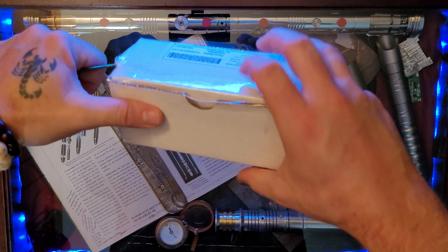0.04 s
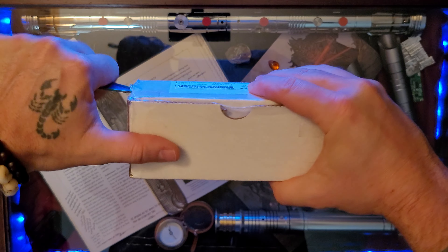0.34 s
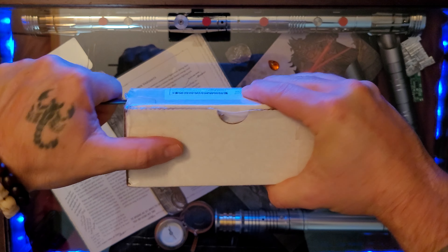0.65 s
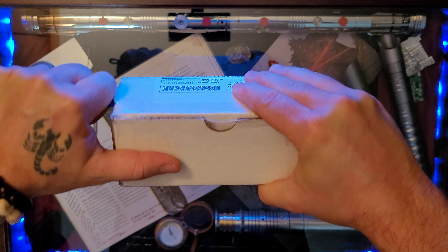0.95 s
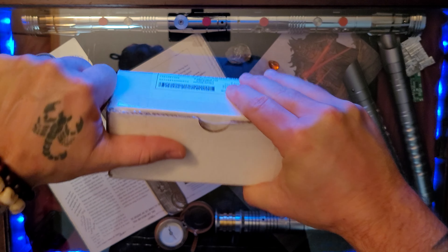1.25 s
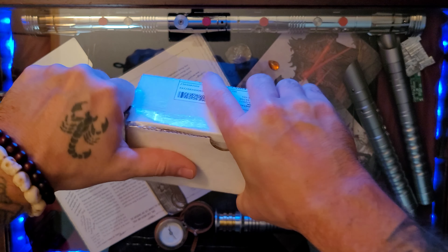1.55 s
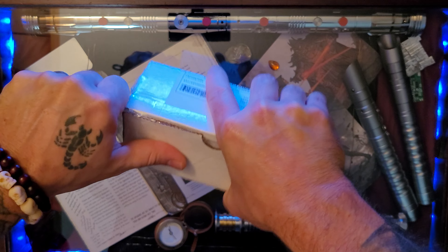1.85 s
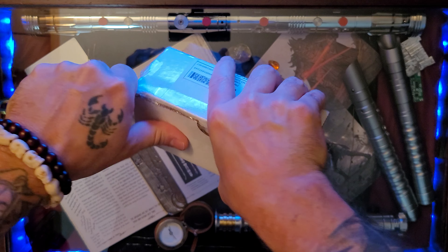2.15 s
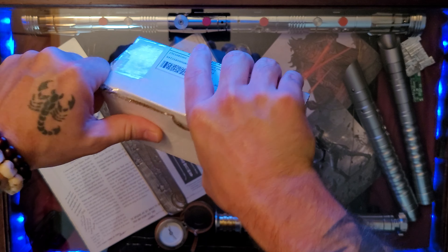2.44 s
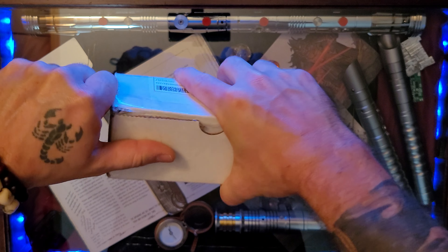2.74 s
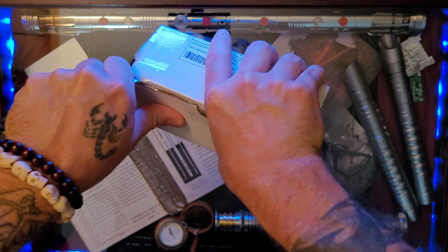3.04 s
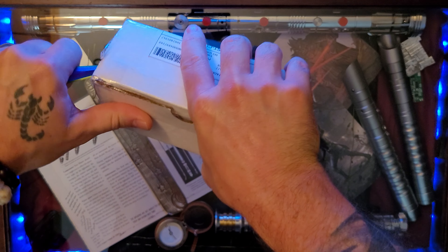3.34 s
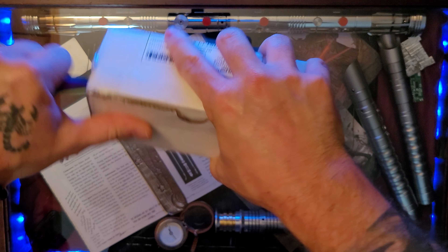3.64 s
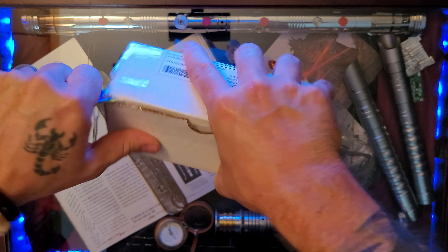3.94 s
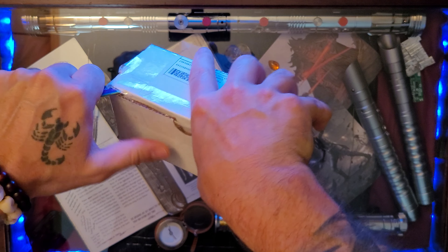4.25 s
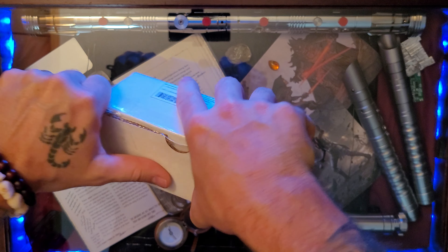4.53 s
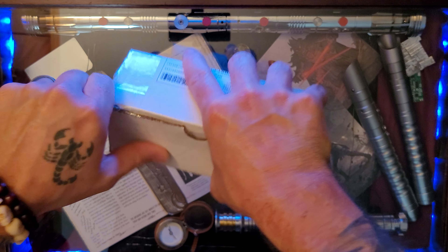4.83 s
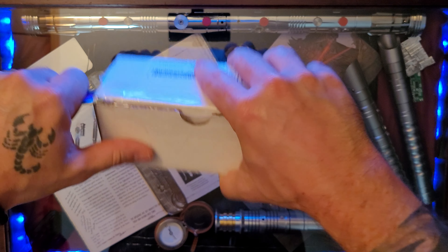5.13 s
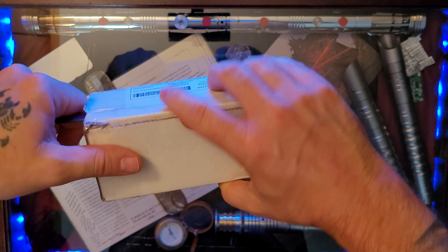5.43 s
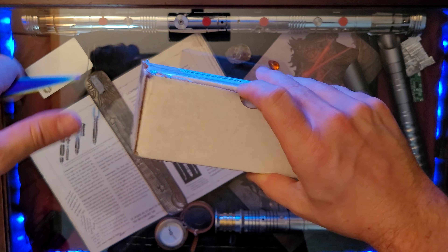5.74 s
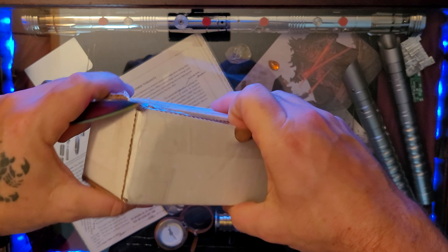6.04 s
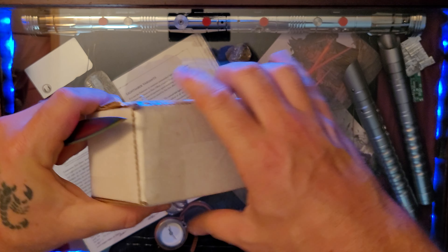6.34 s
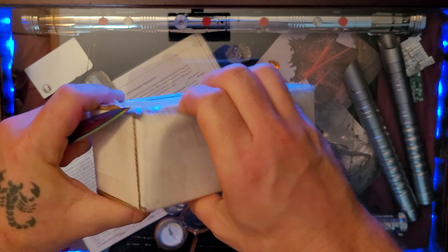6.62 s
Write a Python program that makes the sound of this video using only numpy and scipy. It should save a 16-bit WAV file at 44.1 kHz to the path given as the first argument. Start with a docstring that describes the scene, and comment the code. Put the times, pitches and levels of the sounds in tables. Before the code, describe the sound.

A blade works through a taped cardboard box in irregular, scratchy strokes, heard up close indoors. The tape ticks and squeaks briefly, fibres give way with dry snaps, and the box answers with dull, hollow bumps as fingers rub and shift on it. The cutting is strongest in the first few seconds, then comes in scattered bursts and ends with a cluster of clicks. The room is quiet, with very short echoes.

```python
"""In a quiet room, a knife saws through the packing tape of a small cardboard box, close by.
Each stroke is a stream of tiny slips that ring the box; the blade snaps through fibres and squeaks
on the tape, the film ticks, and hands and blade knock the hollow walls.
The table top and the room add short echoes over a low rumble."""
import sys
import numpy as np
from scipy import signal
from scipy.fft import rfft, irfft
from scipy.io import wavfile
from scipy.ndimage import map_coordinates

SR = 44100
rng = np.random.default_rng(int(sys.argv[2]) if len(sys.argv) > 2 else 0)


def waveform_to_disk(signal):
    """Save audio, clipped to [-1, 1], as 16-bit WAV at the path in sys.argv[1]."""
    frames = np.transpose(np.atleast_2d(signal))
    scaled = np.clip(frames, -1, 1) * 32767
    samples = np.round(scaled).astype(np.int16)
    wavfile.write(sys.argv[1], SR, samples)


N = 303408
TIME_S = np.arange(N) / SR
FFT_SIZE = 2 ** 19
FREQ_HZ = np.maximum(np.fft.rfftfreq(FFT_SIZE, 1 / SR), 1)


def undb(db):
    """Decibels to gain."""
    return 10 ** (np.asarray(db) / 20)


def unit_rms(x):
    """Scale to rms 1."""
    return x / np.sqrt(np.mean(x ** 2))


def curve_db(points):
    """Join (frequency [Hz], level [dB]) points on a log-frequency axis."""
    hz, db = np.transpose(points)
    return np.interp(np.log(FREQ_HZ), np.log(hz), db)


def colour(x, response_db):
    """Minimum-phase filter: resonances ring after the blow."""
    cepstrum = irfft(np.log(undb(response_db)))
    cepstrum[1:FFT_SIZE // 2] *= 2
    cepstrum[FFT_SIZE // 2 + 1:] = 0
    return irfft(rfft(x, FFT_SIZE) * np.exp(rfft(cepstrum)))[..., :x.shape[-1]]


def band(x, hz, kind, order=3):
    """Butterworth filter."""
    return signal.sosfilt(signal.butter(order, hz, kind, fs=SR, output="sos"), x)


def wander(rate_hz):
    """Slow random curve, spread near 1."""
    knots = rng.standard_normal(N // 20)
    return np.interp(TIME_S * rate_hz, np.arange(len(knots)), knots)


def ring(t, hz, t60_s, rise_s):
    """Damped mode, pushed over a short contact time."""
    return np.sin(2 * np.pi * hz * t) * undb(-60 * t / t60_s) * (1 - np.exp(-t / rise_s))


def burst(t, decay_s):
    """Exponentially decaying noise."""
    return rng.standard_normal(len(t)) * np.exp(-t / decay_s)


def swell_db(at_s, hold_s, attack_s, release_s):
    """Blade pressure below its peak; attack and release span 20 dB and take at least 2 ms."""
    before = np.maximum(at_s - TIME_S, 0) / max(attack_s, 0.002)
    after = np.maximum(TIME_S - at_s - hold_s, 0) / max(release_s, 0.002)
    return -20 * (before + after)


def add(track, at_s, sound):
    """Mix a sound in at a time."""
    start = max(int(at_s * SR), 0)
    track[start:start + len(sound)] += sound[:N - start]


def stereo(mid, side):
    """Left and right from mid and side."""
    return np.array([mid + side, mid - side])


# room noise spectrum: (frequency [Hz], level [dB])
ROOM_SPECTRUM = [(20, -21), (35, 3.5), (52, 20), (72, 7), (100, -2.5), (160, -11.5), (240, -4.5),
                 (370, -5.5), (650, -3.5), (1200, -11), (2000, -13), (4000, -30.5), (8000, -52.5),
                 (16000, -23.5)]
# room noise width: (frequency [Hz], side minus mid [dB])
ROOM_SIDE = [(50, -11), (300, -5), (2000, -0.5), (12000, 7)]


def room_tone(level_db=-67.5, waver_db=1, waver_hz=2.19):
    """Low rumble and faint hiss of the room, wavering slightly."""
    mid, side = colour(rng.standard_normal((2, N)), curve_db(ROOM_SPECTRUM))
    noise = stereo(mid, colour(side, curve_db(ROOM_SIDE))) / np.std(mid)
    return noise * undb(level_db + waver_db * wander(waver_hz))


# echo colour, mid channel: (frequency [Hz], gain [dB])
ECHO_MID = [(100, -6), (400, -16), (1200, -9), (2500, 1), (6000, -4), (16000, -1.5)]
# echo colour, side channel: (frequency [Hz], gain [dB])
ECHO_SIDE = [(100, -7), (350, -15), (700, -4.5), (1200, -8.5), (2500, -0.5), (12000, 3)]


def echoes(x, near_t60_s=0.033, near_db=-3, room_t60_s=0.14, room_db=-15, hop_samples=6000):
    """Hands, box and table top scatter the sound at once; the room answers fainter and duller."""
    t = np.arange(SR // 4) / SR
    mid, side = np.zeros((2, N))
    # the box never rests: each stretch crossfades into a new echo pattern
    for centre in range(0, N, hop_samples):
        first, last = max(centre - hop_samples, 0), centre + hop_samples
        fade = np.cos(np.pi / 2 * (TIME_S[first:last] * SR - centre) / hop_samples)
        stretch = x[first:last] * fade
        near = rng.standard_normal((2, len(t))) * undb(-60 * t / near_t60_s) * (t > 0.0003)
        room = band(rng.standard_normal((2, len(t))), 6500, "low", order=1)
        room *= undb(-60 * t / room_t60_s) * (t > 0.008)
        response = (unit_rms(near) * undb(near_db) + unit_rms(room) * undb(room_db)) / np.sqrt(len(t))
        for track, echo in zip((mid, side), signal.fftconvolve(stretch[None], response, axes=1)):
            add(track, first / SR, echo)
    return stereo(colour(mid, curve_db(ECHO_MID)), colour(side, curve_db(ECHO_SIDE)))


# tape film ticks: (time [s], level [dB])
FILM_TICKS = [(0.132, -53), (0.667, -40.5), (1.599, -39.5), (1.6299, -32.5), (1.8471, -39.5), (2.024, -50),
              (2.1137, -35.5), (4.781, -46), (5.8706, -46), (6.0006, -36), (6.2095, -42), (6.304, -42.5)]


def tape_ticks(decay_s=0.0045, gain_db=-6.5, highpass_hz=4000):
    """The film lets go at one point, too lightly to shake the box."""
    t = np.arange(SR // 20) / SR
    ticks = np.zeros(N)
    for at_s, level_db in FILM_TICKS:
        add(ticks, at_s, burst(t, decay_s) * undb(level_db + gain_db))
    return band(ticks, highpass_hz, "high", order=1)


# tape squeaks: (peak time [s], 20 dB rise and fall [s], top pitch [Hz], level [dB])
# a negative rise and fall acts as 2 ms: a blip
TAPE_SQUEAKS = [(.5, -0.52, 2580, -49), (.765, -0.39, 3260, -46), (.81, 0.1, 3520, -41),
                (1.892, -0.04, 3000, -30), (2.478, -0.04, 2990, -33), (2.945, 0.14, 3004, -56),
                (5.13, -0.18, 3070, -44)]


def tape_squeaks(flutter_hz=150, sag_hz_per_db=15, gain_db=-3):
    """Stick-slip of blade on tape: a rough whistle whose pitch sags as the pressure eases."""
    squeaks = np.zeros(N)
    flutter = unit_rms(band(rng.standard_normal((2, N)), flutter_hz, "low", order=2))
    for at_s, fade_s, top_hz, level_db in TAPE_SQUEAKS:
        pressure_db = swell_db(at_s, 0, fade_s, fade_s)
        live = pressure_db > -40
        phase = 2 * np.pi * np.cumsum(top_hz + sag_hz_per_db * pressure_db[live]) / SR
        whistle = flutter[0, live] * np.cos(phase) + flutter[1, live] * np.sin(phase)
        squeaks[live] += whistle * undb(level_db + gain_db + pressure_db[live])
    return squeaks


# blade modes: (frequency [Hz], level [dB], t60 [s])
BLADE_MODES = [(2950, -2, 0.033), (3160, -4, 0.015), (3560, 4.5, 0.011), (3930, -0.5, 0.016),
               (4270, -8, 0.016)]


def blade_flick(at_s=6.3852, gain_db=-25, rise_s=0.0001):
    """The tip jumps free of a cardboard edge and rings briefly."""
    t = np.arange(SR // 5) / SR
    flick = np.zeros(N)
    for hz, level_db, t60_s in BLADE_MODES:
        add(flick, at_s, ring(t, hz, t60_s, rise_s) * undb(level_db + gain_db))
    return flick


# box resonances: (frequency [Hz], width [Hz], lift [dB])
BOX_RESONANCES = [(334, 114, 4), (372, 83, 5.5), (520, 43, 2.5), (442, 30, 1.5), (797, 210, 6),
                  (992, 24, 9), (1181, 139, 14.5), (1356, 37, 10.5), (1428, 57, 7.5), (1603, 126, 7),
                  (1786, 51, 5), (1991, 27, 6.5), (2460, 50, 1.5), (2880, 1220, 6.5), (3800, 110, 3),
                  (5000, 300, 3), (7600, 1560, -3)]


def box_lift_db():
    """Lift that the box's resonances give to whatever shakes it."""
    return sum(db / (1 + (2 * (FREQ_HZ - hz) / width_hz) ** 2) for hz, width_hz, db in BOX_RESONANCES)


# modes of the whole hollow box: (frequency [Hz], level [dB])
BOOM_MODES = [(73, -2.5), (148, -2), (168, -5.5), (208, -1.5), (256, -9)]
# wall knocks: (time [s], level [dB], wall mode [Hz], relative boom [dB])
WALL_KNOCKS = [(0.428, -39, 396, -38), (0.584, -25.5, 317, -14), (0.847, -28, 670, -22),
               (0.944, -35.5, 593, -8), (1.025, -35, 390, -19), (1.131, -41.5, 440, -27.5),
               (1.53, -40, 390, -10), (1.634, -28.5, 345, -18), (1.885, -24.5, 410, -36),
               (2.188, -41.5, 350, -4.5), (2.556, -37.5, 370, -9.5), (2.72, -46, 390, -7.5),
               (2.783, -52, 372, -16), (3.865, -49, 340, -1.5), (3.022, -30, 535, -20.5),
               (4.365, -34, 292, -9), (4.555, -43, 537, -25), (4.628, -26, 347, -12.5),
               (4.67, -21, 430, -17), (4.882, -40.5, 470, -14.5), (5.092, -31.5, 364, -8.5),
               (5.248, -39, 430, -10.5), (5.537, -43, 294, -3.5), (5.757, -24, 404, -23),
               (5.892, -31.5, 327, -16), (6.12, -28.5, 281, -7.5), (6.157, -43.5, 280, 2),
               (6.293, -40, 415, -30), (6.383, -26.5, 581, -25), (6.423, -28.5, 397, -14.5),
               (6.532, -40, 603, -24), (6.619, -30.5, 376, -16), (6.642, -20, 423, -17.5)]


def wall_knocks(wall_t60_s=0.039, boom_t60_s=0.094, tone_db=-5, scuff_db=-8, scuff_s=0.011):
    """A soft blow rings one wall and the whole box, with a short dull scuff."""
    t = np.arange(SR // 5) / SR
    tones, scuffs = np.zeros((2, N))
    # where the blow lands sets each mode's first swing
    polarities = rng.choice([-1, 1], (len(WALL_KNOCKS), len(BOOM_MODES)))
    modes = np.array([ring(t, hz, boom_t60_s, rise_s=0.003) * undb(db) for hz, db in BOOM_MODES])
    for (at_s, level_db, wall_hz, boom_db), polarity in zip(WALL_KNOCKS, polarities):
        wall = ring(t, wall_hz, wall_t60_s, rise_s=0.0051)
        boom = polarity @ modes * undb(boom_db)
        add(tones, at_s, (wall + boom) * undb(level_db + tone_db))
        add(scuffs, at_s, burst(t, scuff_s) * undb(level_db + scuff_db))
    return tones + colour(band(scuffs, [200, 1000], "band", order=2), box_lift_db())


# snap spectrum: (frequency [Hz], level [dB])
SNAP_SPECTRUM = [(100, -48), (500, 2), (1200, -2), (3000, -4.5), (6000, -0.5), (10000, -7.5), (16000, -20)]
# modes of a small patch of board: (frequency ratio [1], level [dB])
PATCH_MODES = [(1.001, 0), (1.56, -7), (2.04, -17.5)]
# breaks in tape or fibre: (time [s], level [dB], patch pitch [Hz], sharpness [dB])
FIBRE_SNAPS = [(0.27, -44, 1150, -32), (0.342, -38.5, 1200, 2), (0.586, -25, 1300, -11),
               (0.798, -22.5, 1450, -8), (0.848, -17.5, 1234, -8), (0.946, -24, 1306, -5.5),
               (1.199, -29, 3040, -13), (1.347, -28.5, 1250, -8), (1.629, -34, 1250, -29),
               (1.881, -27, 1390, -9), (1.906, -26, 1240, -15), (2.172, -42, 1210, -22),
               (2.233, -25, 1620, -5.5), (2.334, -30, 2920, -6), (2.989, -35, 1330, -1),
               (3.032, -20, 1135, -24), (3.415, -32, 2840, -0.5), (3.602, -46, 1670, 0.5),
               (4.309, -39, 1100, -18), (4.369, -33.5, 1380, -9.5), (4.56, -43, 830, -13),
               (4.629, -25.5, 1820, 2), (4.638, -22, 2590, -7), (4.886, -40, 1220, -11),
               (5.094, -34, 2610, -12), (5.314, -22, 1240, -7), (5.366, -22.5, 1160, -18),
               (5.487, -41, 1090, -8), (5.758, -28.5, 1205, -22), (5.834, -21.5, 1127, -26),
               (5.894, -31, 1330, -5.5), (6.003, -34.5, 1940, -12), (6.122, -35, 1120, 0.5),
               (6.384, -24, 2450, -1), (6.424, -29, 1180, 0), (6.432, -28.5, 3900, -1.5),
               (6.599, -47.5, 2710, -9), (6.618, -39, 930, -28), (6.645, -33, 1080, -15),
               (6.766, -28.5, 1310, -22), (6.777, -30, 1340, -17), (6.83, -25, 1290, -6.5),
               (6.855, -36.5, 3000, 1.5)]


def fibre_snaps(tear_s=0.0064, ring_db=-7.5, board_db=-2, crack_db=5, crossover_hz=3800):
    """A sharp break, a few ms of tearing fibres, and the ring of the released patch."""
    t = np.arange(SR // 10) / SR
    board, cracks, rings = np.zeros((3, N))
    for at_s, level_db, patch_hz, sharp_db in FIBRE_SNAPS:
        tear = 0.39 * burst(t, tear_s)
        tear[0] = -1  # the break itself
        add(board, at_s, tear * undb(level_db + board_db + 0.22 * sharp_db))
        add(cracks, at_s, tear * undb(level_db + crack_db + sharp_db))
        # a dull break is slow: the patch is pushed, and sounds, for longer
        push_s = 0.00005 * undb(-sharp_db)
        t60_s = 0.014 + 9 * push_s
        patch = sum(ring(t, patch_hz * k, t60_s / k, push_s) * undb(db) for k, db in PATCH_MODES)
        add(rings, at_s, -patch * undb(level_db + ring_db))
    breaks = band(board, crossover_hz, "low") + band(cracks, crossover_hz, "high")
    return colour(breaks, curve_db(SNAP_SPECTRUM) + box_lift_db()) + colour(rings, box_lift_db() / 2)


# fingers and resting blade rubbing the box: (time [s], level [dB])
RUB_LEVELS = [(0, -68), (.27, -78), (.45, -79), (.68, -63), (1.14, -78.5), (1.3, -72), (1.48, -63.5),
              (1.8, -71.5), (2.08, -69.5), (2.42, -78.5), (3.22, -70), (3.5, -80), (4.32, -77), (4.82, -71),
              (5.95, -71.5), (6.48, -68), (6.56, -77), (6.88, -69.5)]
# knife strokes: (peak time [s], hold [s], level [dB], 20 dB attack [s], 20 dB release [s],
# relative tape hiss [dB], relative wall tone [dB])
KNIFE_STROKES = [(0.065, 0.0052, -50, 0.015, 0.023, -9.5, -4.5),
                 (0.155, 0.034, -64, 0.018, 0.061, -10.5, -1.5), (0.335, 0.005, -57.5, 0.028, 0.12, 3, -16),
                 (0.462, 0.095, -58.5, 0.012, .062, 1.5, -17),
                 (0.569, 0.024, -36.5, 0.023, 0.041, -2.5, -13),
                 (0.787, 0.082, -46, 0.03, 0.033, 1.5, -9.5), (0.979, 0.061, -46.5, 0.032, 0.064, 1, -11.5),
                 (1.186, 0.018, -47.5, 0.028, 0.031, -2.5, -14.5),
                 (1.241, 0.038, -58.5, .042, 0.013, 0, -15), (1.338, .039, -44, 0.022, 0.028, 1, -13.5),
                 (1.4, 0.044, -55.5, 0.058, 0.052, -1, -3), (1.54, .005, -56.5, .03, 0.025, -8, 0.5),
                 (1.659, 0.005, -52.5, 0.02, 0.029, 0.5, -3.5), (1.878, .03, -35, 0.017, 0.036, -3, -11.5),
                 (2.126, 0.015, -55.5, 0.022, 0.03, -4, -5.5), (2.187, .012, -50.5, 0.02, 0.077, -7, -7),
                 (2.233, 0.033, -41, 0.02, .028, -2.5, -14),
                 (2.293, 0.056, -47.5, 0.036, 0.031, -1.5, -13.5),
                 (2.468, 0.084, -50.5, 0.018, 0.043, -7, -11), (2.72, 0.032, -51, 0.067, .05, -1, -11),
                 (2.762, 0.031, -48, 0.022, .06, 2.5, -9), (2.919, 0.018, -54, 0.038, 0.09, -4.5, -12.5),
                 (3.014, 0.023, -41, 0.025, 0.044, -9.5, -10),
                 (3.139, 0.036, -53, 0.052, 0.0097, -4, -12.5),
                 (3.327, 0.051, -59.5, 0.017, .037, -6, -7.5),
                 (3.395, 0.023, -47.5, 0.058, 0.039, -7.5, -12),
                 (3.604, 0.027, -63.5, 0.09, .02, -6.5, -2.5), (3.768, 0.028, -50, 0.023, 0.11, -5.5, -11),
                 (3.959, 0.13, -47.5, 0.053, 0.05, -1, -15), (4.205, 0.013, -58.5, 0.15, 0.0088, -11, -13),
                 (4.41, 0.035, -44, 0.019, 0.012, -7, -14.5),
                 (4.463, 0.048, -54.5, 0.042, 0.035, -6, -12.5),
                 (4.613, 0.03, -43.5, 0.0086, 0.031, -4.5, -14), (4.67, .009, -36, 0.015, 0.027, 1, -11),
                 (4.71, 0.021, -53.5, .04, 0.023, 0, -14), (4.985, 0.07, -66, .072, 0.077, -1, -23),
                 (5.101, 0.11, -57, 0.13, 0.22, -10, -10.5), (5.314, 0.008, -39, .03, .045, -6.5, -17.5),
                 (5.355, 0.031, -40.5, 0.029, .04, -5, -9),
                 (5.541, 0.0081, -52.5, 0.095, 0.011, -12.5, -2.5),
                 (5.675, 0.072, -53, 0.011, 0.031, -0.5, -7), (5.875, .028, -61, 0.046, 0.022, -6, -3.5),
                 (6.121, 0.049, -65, .035, 0.025, 0.5, 0.5), (6.389, 0.041, -48, 0.033, 0.019, -3, -9),
                 (6.762, 0.025, -56.5, .027, 0.047, -7, -14), (6.833, 0.015, -51.5, 0.015, 0.043, 1.5, -30)]


def drag_gains(rub_wall_db=-4, rub_hiss_db=-3):
    """Gains of wall tone, board rasp and tape hiss: strokes add in power to the slowly changing rub."""
    rub_db = np.interp(TIME_S, *np.transpose(RUB_LEVELS))
    power = (undb([[rub_wall_db], [0], [rub_hiss_db]]) * undb(rub_db)) ** 2
    for at_s, hold_s, level_db, attack_s, release_s, hiss_db, wall_db in KNIFE_STROKES:
        pressure_db = swell_db(at_s, hold_s, attack_s, release_s)
        live = pressure_db > -60
        power[:, live] += (undb([[wall_db], [0], [hiss_db]]) * undb(level_db + pressure_db[live])) ** 2
    return np.sqrt(power)


def shifting_modes(x, depth_db=2.5, cell_hz=330, cell_s=0.03):
    """As the blade travels and the grip shifts, each stretch of the cut favours other board modes."""
    hz, times_s, spectra = signal.stft(x, SR, nperseg=256)
    field = rng.standard_normal((200, 400))
    grid = np.meshgrid(hz / cell_hz, times_s / cell_s, indexing="ij")
    lift_db = depth_db * map_coordinates(field, grid, order=3, mode="wrap")
    lift_db *= np.minimum(hz / 2500, 1)[:, None]
    return signal.istft(spectra * undb(lift_db), SR)[1][..., :N]


def blade_friction(slips_per_s=1900, scatter_db=2, fibres_per_s=75, judder_db=3.3, catch_db=1.28):
    """Tiny slips over a smooth rub; whole fibres give way harder; the blade judders and catches."""
    sizes = undb(scatter_db * np.minimum(rng.exponential(size=(2, N)), 3.5))
    sizes *= rng.choice([-1, 1], (2, N))
    slips = unit_rms(sizes * (rng.random((2, N)) < slips_per_s / SR))
    rub = 0.74 * rng.standard_normal((2, N))
    fibres = 19 * rng.uniform(-0.97, 1, (2, N)) * (rng.random(N) < fibres_per_s / SR)
    uneven_db = judder_db * np.tanh(wander(rate_hz=190)) + catch_db * wander(rate_hz=45)
    return (slips + rub + fibres) * undb(uneven_db)


# slip spectrum: (frequency [Hz], level [dB])
SLIP_SPECTRUM = [(60, -15.5), (150, -10.5), (230, -10), (360, -2.5), (620, -1.5), (1100, 0.5), (2000, 0.5),
                 (3000, -4), (4500, -6), (8000, -1), (12500, -8.5), (16000, -9)]
# slip width: (frequency [Hz], side minus mid [dB])
SLIP_SIDE = [(100, -10), (400, -20), (700, -27.5), (1200, -15), (2500, -12.5), (6000, -20), (12000, -10.5)]


def knife_rasp(wall_db=2.5, tilt_db_per_db=0.2):
    """Friction of the sawing blade shakes walls, board and tape film. Returns mid and side."""
    scrape = shifting_modes(colour(blade_friction(), curve_db(SLIP_SPECTRUM) + box_lift_db()))
    walls = unit_rms(band(scrape, 680, "low", order=5))
    board = unit_rms(band(scrape, [720, 4300], "band", order=5))
    film = unit_rms(band(scrape, 4400, "high", order=4))
    wall_gain, board_gain, hiss_gain = drag_gains()
    # the more the blade runs in tape rather than board, the brighter the hiss
    hiss_db = 20 * np.log10(hiss_gain / board_gain)
    tilt_db = tilt_db_per_db * np.clip(hiss_db - np.median(hiss_db), -10, 10)
    tape = band(film, 9000, "low") * undb(-tilt_db / 2) + band(film, 9000, "high") * undb(tilt_db)
    mid, side = walls * wall_gain * undb(wall_db) + board * board_gain + tape * hiss_gain
    return mid, colour(side, curve_db(SLIP_SIDE))


def scene(right_minus_left_db=0.5):
    """Knife and box with their echoes, over the room tone."""
    rasp_mid, rasp_side = knife_rasp()
    direct = rasp_mid + tape_squeaks() + fibre_snaps() + blade_flick() + tape_ticks() + wall_knocks()
    balance = undb([[-right_minus_left_db / 2], [right_minus_left_db / 2]])
    return (stereo(direct, rasp_side) + echoes(direct)) * balance + room_tone()


def record(dry):
    """Steep low-pass at 16 kHz."""
    return signal.sosfilt(signal.ellip(10, 0.2, 70, 16000, fs=SR, output="sos"), dry)


dry = scene()
out = record(dry)
waveform_to_disk(out)
```